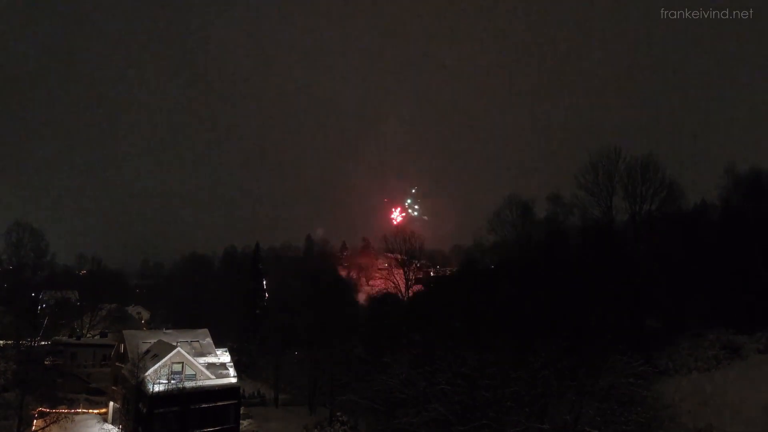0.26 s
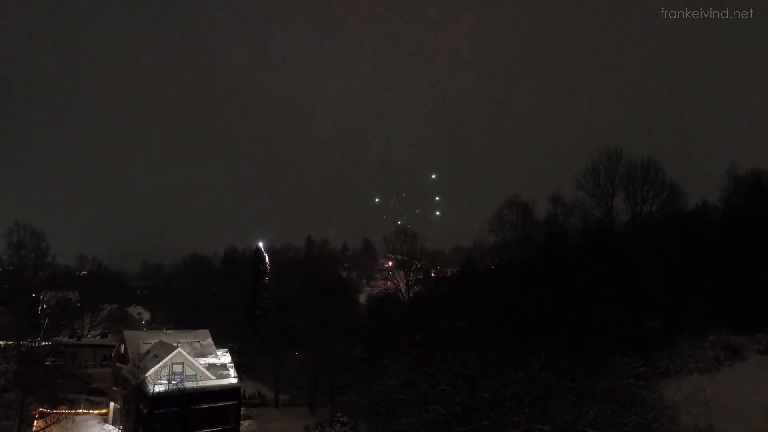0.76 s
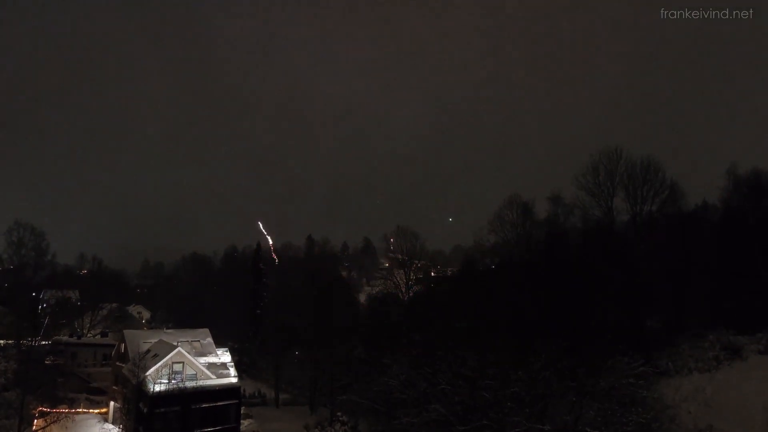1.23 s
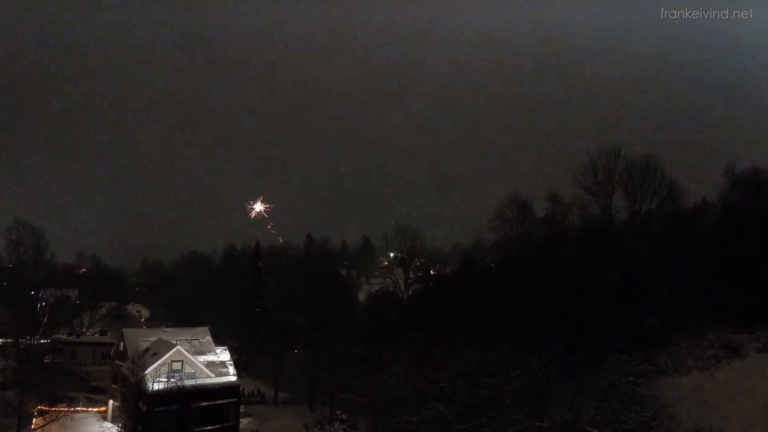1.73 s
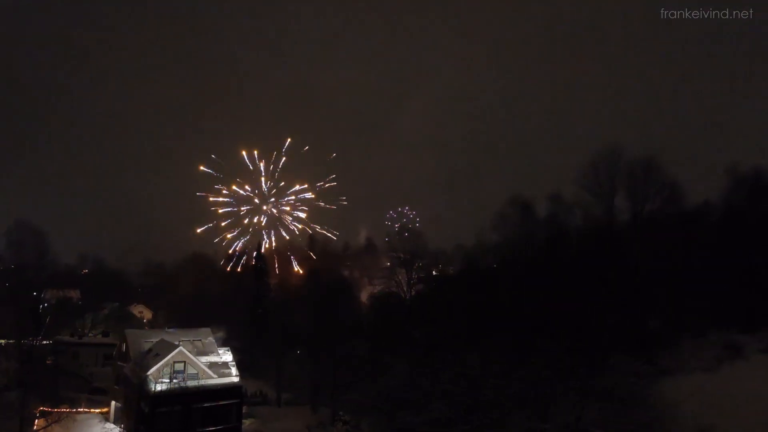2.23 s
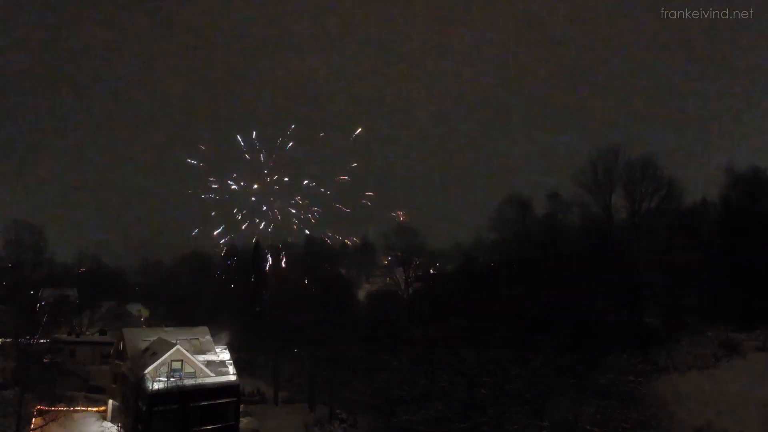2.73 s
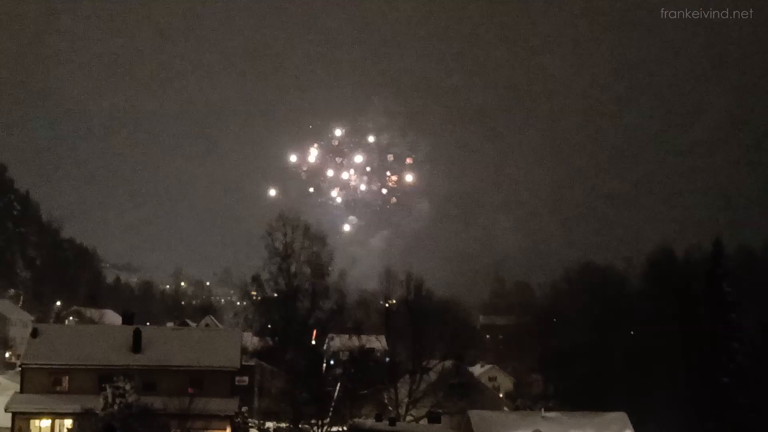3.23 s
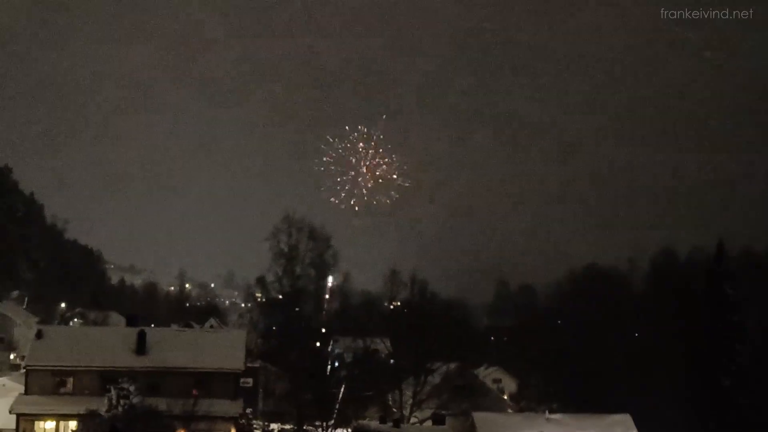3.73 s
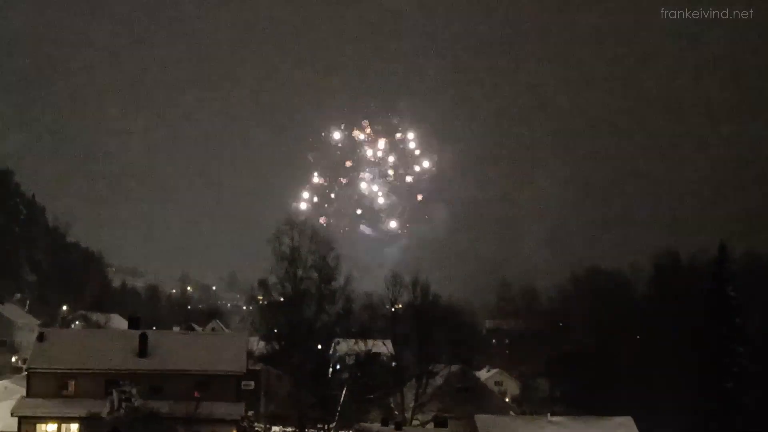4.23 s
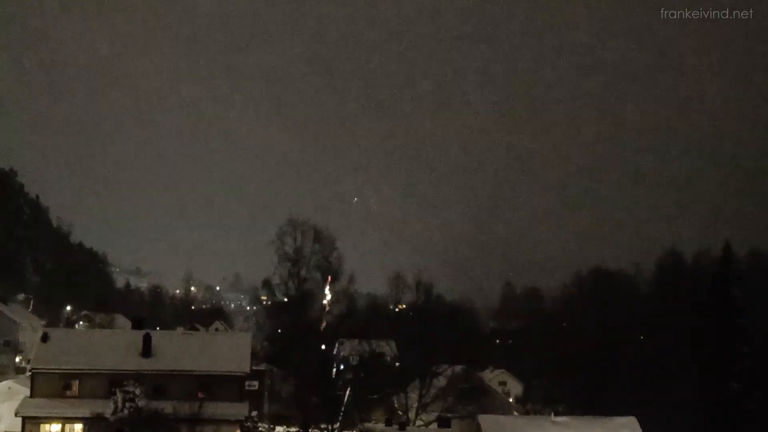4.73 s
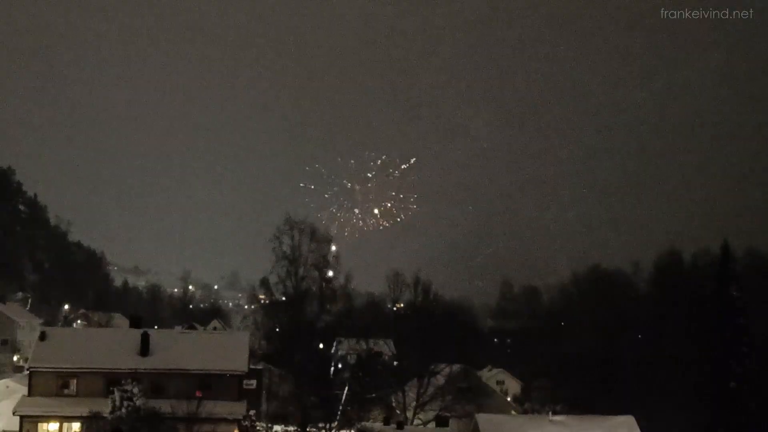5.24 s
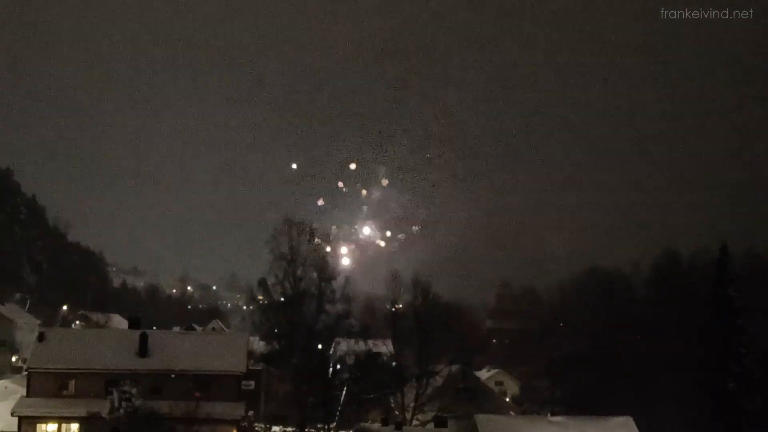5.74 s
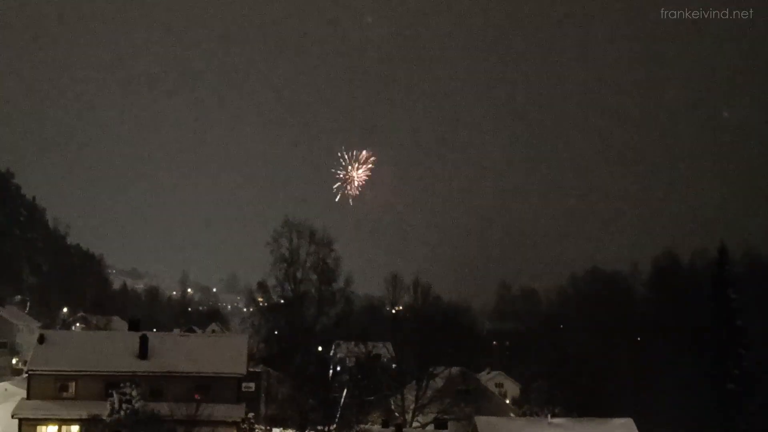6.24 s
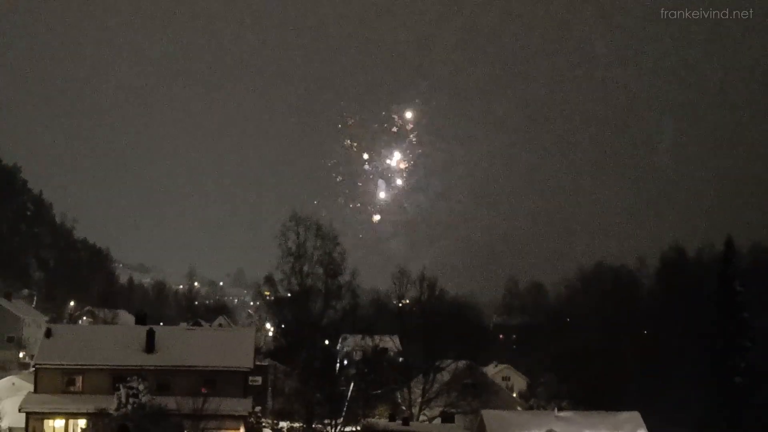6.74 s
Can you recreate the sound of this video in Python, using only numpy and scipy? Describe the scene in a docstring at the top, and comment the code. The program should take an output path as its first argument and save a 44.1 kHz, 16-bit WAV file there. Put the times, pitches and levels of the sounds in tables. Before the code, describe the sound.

A continuous distant barrage rumbles beneath irregular firework bangs, some deep and blurred, others loud and punchy, with short house slaps and longer hillside echoes. Low wind puffs buffet either side of the small outdoor microphone. Faint pips, sizzling rockets and stray sparks come first; after a click and short dip around three seconds, bright dense crackles bloom ahead four or five times, the last overlapping at the end.

```python
"""Fireworks over a snowy neighbourhood, outdoors on a small two-port microphone, a wall a metre behind it. From
the start wind flutters on the ports and many far bursts merge into a rumble; soon shells go off, each one
pressure pulse with echoes off houses and trees. Faint ringing pips, fizzing rocket tails and stray sparks
(filtered grains) follow, then dry cracks with a steep edge. Near three seconds a click sounds and the level
dips briefly; after it, clouds of crackling stars swell and burn out, made of many small reports with echoes."""
import sys
import numpy as np
from scipy import signal
from scipy.fft import rfft, irfft, next_fast_len
from scipy.io import wavfile
from scipy.ndimage import uniform_filter1d

SR = 44100
rng = np.random.default_rng(int(sys.argv[2]) if len(sys.argv) > 2 else 0)


def unload_audio(sound):
    """Save the sound as a 16-bit wav file, at the path given as the first command line argument."""
    columns = np.transpose(np.atleast_2d(sound))
    # keep every value between -1 and 1, then stretch to whole-number steps
    steps = np.round(np.clip(columns, -1, 1) * 32767)
    wavfile.write(sys.argv[1], SR, steps.astype(np.int16))


N = 307818
TIME = np.arange(N) / SR
SIZE = 16384  # samples in one pulse or echo pattern
PORT_LAG_S = .00058  # lag between the ports for a sound from the side
TOP_HZ = 16400  # top of the microphone's range
BURN_STEEPNESS = 3  # how abruptly a cloud of sparks lights up and dies
STRAY_FROM_S = 0.91  # when stray sparks begin to spit

# Levels in the tables come before each layer's own gain.
# Level of the far barrage by direction: [t/s, from the right level/dB, from ahead level/dB]
FAR_BARRAGE = [(0, -35.5, -34.5), (1.52, -32.5, -36.5), (2.25, -38.5, -39), (2.75, -31, -32),
               (2.999, -40, -30.5), (3.7, -39.5, -33), (5.35, -36, -32.5), (5.72, -39.5, -34.5),
               (6.12, -41.5, -36.5), (6.28, -39.5, -32.5), (6.98, -36, -33.5)]
# Wind puffs: [t/s at the height, spread/s (standard deviation), level/dB, side (-1 left port, 1 right port)]
WIND_PUFFS = [(0.064, 0.11, -23, 1), (0.497, 0.023, -17, 1), (0.984, 0.079, -18.5, -1),
              (1.148, 0.018, -16, -1), (1.337, 0.013, -8, -1), (2.37, 0.055, -18.5, -1),
              (4.226, 0.021, -21.5, 1), (4.671, 0.016, -16.5, 1), (4.725, 0.015, -9.5, 1),
              (5.154, 0.075, -18.5, -1), (5.581, 0.08, -25.5, -1)]
# Shell bursts and their loudest separate echoes, each row one pulse: [t/s, peak level/dB of the bare pulse,
# boom f/Hz (lower for a bigger charge), echo level/dB (more when screened by trees), launch site]. Rows a few
# ms to some tens of ms after a loud burst, such as 0.8892, 0.8994 and 1.1314, are its echoes.
SHELL_PULSES = [(0.244, -4, 310, 6.5, "right"), (0.2554, -9, 280, -6, "half right"),
                (0.2968, -14.5, 180, 4, "far right"), (.444, -16, 171, -4.5, "far right"),
                (.5123, -4.5, 1100, -6, "ahead"), (0.5206, -11, 1800, 0, "right"),
                (0.6247, -9, 420, 8.5, "right"), (0.6499, -8.5, 770, -4, "half right"),
                (0.8797, .5, 620, -1, "ahead"), (0.8892, -7, 520, -2, "ahead"),
                (0.8994, -5, 450, -4, "ahead"), (1.1133, 0, 750, -3, "ahead"),
                (1.1314, -7.5, 550, -2, "half right"), (1.462, -.5, 290, -2.5, "right"),
                (1.4671, -3, 280, -8, "half right"), (1.4704, -1.5, 350, -6, "right"),
                (1.522, -12, 173, 4, "far right"), (1.749, -12, 470, 5.5, "near"),
                (1.8108, -10, 1200, 4.5, "half right"), (1.96, -8.5, 750, 0.5, "half right"),
                (2.1256, -13.5, 330, -2, "far right"), (2.228, -15, 450, -3.5, "far right"),
                (2.409, -0.5, 260, 1, "ahead"), (2.4345, -1.5, 260, 1, "half right"),
                (2.4635, -8.5, 150, 7.5, "half right"), (2.502, -0.5, 150, -1.5, "half right"),
                (2.6882, -3.5, 290, 1.5, "near"), (2.7475, 0, 800, -5.5, "ahead"),
                (2.8354, -17, 260, 5.5, "half right"), (2.9431, 1.5, 278, -5, "half right"),
                (2.987, -5.5, 415, 0, "far right"), (3.0923, -4.5, 1000, -6.5, "half right"),
                (3.1005, -2, 515, -18, "far right"), (3.2443, -2.5, 150, 4, "right"),
                (3.3175, -8.5, 194, -26, "half right"), (3.7275, -3.5, 600, -18, "far right"),
                (3.796, -8, 480, 0.5, "far right"), (4.1017, -2, 680, -10, "far right"),
                (4.1542, -5, 480, 5, "far right"), (4.1813, -8, 239, 7.5, "right"),
                (4.3957, -11, 220, 8, "left"), (4.4089, 0, 330, -1, "near"), (4.4244, -1, 393, -13, "left"),
                (4.5068, -6.5, 587, -5, "left"), (4.585, -14, 455, 0.5, "far right"),
                (4.8274, -6.5, 450, -1.5, "far right"), (4.905, -15, 330, -2, "far right"),
                (5.131, -10.5, 910, 7.5, "far right"), (5.1765, -6, 300, 4.5, "right"),
                (5.2106, -1.5, 470, 0, "far right"), (5.595, -12.5, 600, 5, "far right"),
                (5.6155, -3.5, 520, -4, "far right"), (5.6368, -5, 720, -9, "far right"),
                (5.7354, -1.5, 600, -4.5, "near"), (5.7494, -5, 330, -8, "left"),
                (5.8142, -11.5, 520, 0.5, "far right"), (5.831, -13.5, 900, 0.5, "far right"),
                (5.9519, -6, 520, -4, "far ahead"), (5.9888, 0, 620, -10.5, "far right"),
                (6.047, -15.5, 330, 1.5, "far right"), (6.178, -11, 1150, -2, "far right"),
                (6.239, -14, 300, -2, "far right"), (6.5193, -5.5, 1500, -3, "near"),
                (6.682, -4.5, 1470, 0, "ahead"), (6.697, -4, 380, 2, "ahead"),
                (6.7858, -8.5, 500, -10, "near"), (6.8195, -11, 1450, 2, "near")]
# Launch sites; the name is only a label, the lag sets the direction heard. By name:
# [air cut-off f/Hz (lower when far), left port late/ms, left port late for the echoes/ms,
# lag of the nearest house front's slap/ms, slap level/dB, body f/Hz, body level/dB]
LAUNCH_SITES = {"ahead": (2900, 0, 0.24, 18.5, -17, 1020, 3.5),
                "near": (6006, 0, 0.56, 14.5, -14.5, 1597, 5),
                "right": (3201, 0.44, .5, 4.5, -10, 1498, 7.5),
                "half right": (2000.5, 0.48, 0.44, 8.5, -13, 326.5, 3.5),
                "far right": (1120, 0.51, 0.44, 11, -19.5, 571.5, 1.5),
                "left": (1597, 0.27, 0.2, 9, -16, 1399.5, 5.5),
                "far ahead": (1000, -0.5, 0.9, 9.5, -14, 514, 4)}
# Faint pips: [t/s, peak level/dB]
FAINT_PIPS = [(.8, -29), (.815, -32), (.838, -34), (.853, -36)]
# Fizzing rocket tails: [t/s at the height, half width/s, level/dB]
ROCKET_TAILS = [(.82, 0.043, -55), (1.2, 0.12, -49.5), (1.48, 0.17, -41.5), (1.9, .15, -48.5),
                (2.485, 0.052, -36), (2.64, 0.13, -47), (2.88, 0.063, -52), (4.62, 0.14, -57),
                (5.85, 0.2, -56)]
# Single loud sparks: [t/s, peak level/dB]
LOUD_SPARKS = [(2.179, -26), (2.331, -22.5), (2.339, -25), (2.356, -26.5), (3.909, -25.5), (4.499, -22.5),
               (6.187, -26)]
# Very sharp, dry cracks: [t/s, peak level/dB before panning, cut-off f/Hz, left minus right level/dB, echo level/dB]
SHARP_CRACKS = [(2.034, -20, 6800, -13, 11), (2.409, -20, 11400, 0, 6), (2.689, -13, 12300, 2, 12),
                (3.3021, 3.5, 11000, -12, -10.5)]
# Clouds of crackling stars: [t/s at the height, half width/s, level/dB]
STAR_CLOUDS = [(3.282, 0.21, -29.5), (4.15, 0.19, -26), (5.192, 0.17, -25), (6.52, .14, -24.5),
               (6.678, 0.091, -25)]
# Single loud stars: [t/s, peak level/dB]
LOUD_STARS = [(3.202, -12), (3.226, -8.5), (3.241, -8), (3.296, -8), (3.472, -14.5), (4.042, -15.5),
              (4.073, -14), (4.215, -13), (5.019, -15.5), (5.05, -10.5), (5.071, -15), (5.081, -8.5),
              (5.261, -9), (5.307, -15), (5.389, -13), (5.459, -15.5), (5.472, -14.5), (6.367, -10.5),
              (6.375, -10.5), (6.439, -12.5), (6.495, -9.5), (6.582, -10), (6.593, -7), (6.626, -8),
              (6.669, -12), (6.704, -5), (6.727, -7.5), (6.786, -11.5), (6.89, -16)]
# Spectral colour of far rumble, wind, shells, fizz and crackle, each: [f/Hz, level/dB]
FAR_COLOUR = [(25, -28), (70, -9.5), (150, 2.5), (480, 2.5), (800, -6.5), (1900, -12.5), (2700, -28),
              (3900, -32.5), (5000, -55.5), (8000, -61), (15000, -75)]
WIND_SPECTRUM = [(20, -17.5), (50, -4), (120, -0.5), (180, -10), (400, -27.5), (6000, -100)]
SHELL_COLOUR = [(40, -9), (100, 2), (190, 2), (500, -.5), (800, -3.5), (2050, -1), (2700, -11), (4000, -2),
                (6300, -13), (8500, -32), (16000, -36)]
SPARK_COLOUR = [(400, 7), (1900, 7), (2600, -1.5), (3500, 3.5), (4400, -1), (5000, -5.5), (6200, -6.5),
                (7200, -27), (10000, -45.5)]
STAR_COLOUR = [(150, -9), (500, -5.5), (1100, 6), (2100, 5.5), (2600, -13), (3100, -20), (3700, -5.5),
               (4400, -9), (5000, -21), (6400, -32), (7500, -46.5), (12000, -61)]


def undb(db):
    """Decibels to gain."""
    return 10 ** (np.asarray(db) / 20)


def unit(x):
    """Scale to rms 1."""
    return x / np.sqrt(np.mean(x ** 2))


def response(points, size=2048):
    """Causal (minimum-phase) impulse response with the given (f/Hz, level/dB) colour."""
    hz, db = np.transpose(points)
    log_hz = np.log(np.fft.rfftfreq(size, 1 / SR) + 1)
    log_gain = np.log(undb(np.interp(log_hz, np.log(hz), db)))
    # folding the cepstrum onto positive times makes the response causal
    cepstrum = irfft(log_gain)
    cepstrum[1:size // 2] *= 2
    cepstrum[size // 2 + 1:] = 0
    return irfft(np.exp(rfft(cepstrum)))


def ring(x, impulse):
    """Pass both channels through an impulse response."""
    return signal.oaconvolve(x, np.atleast_2d(impulse), axes=1)[:, :x.shape[1]]


def add(out, sound, start_s):
    """Mix a stereo sound in at a given time."""
    i = max(int(start_s * SR), 0)
    out[:, i:i + sound.shape[1]] += sound[:, :max(N - i, 0)]


def arrivals(times, sizes, lags, length):
    """Impulses that reach the two ports a little apart, by their direction."""
    out = np.zeros((2, length))
    for port, when in zip(out, (times + lags / 2, times - lags / 2)):
        np.add.at(port, np.round(when * SR).astype(int) % length, sizes)
    return out


def echoes(decay_s, count, lag_s=0, width=0.92, rise_s=0.0074):
    """Reflections scattered about the source's direction, building up and dying away; energy 1 per port."""
    when, where = rng.random((2, count))
    times = PORT_LAG_S * 2 + when * min(5 * decay_s, SIZE / SR - .01)
    envelope = np.exp(-times / decay_s) * (1 - np.exp(-times / rise_s))
    sizes = rng.standard_normal(count) * envelope
    lags = np.clip(lag_s + width * PORT_LAG_S * (2 * where - 1), -PORT_LAG_S, PORT_LAG_S)
    return arrivals(times, sizes / np.linalg.norm(sizes), lags, SIZE)


def swarm(colour, count, spread_db, width, echo_s, echo_db, echo_width, lag_s=0, parts=4):
    """Many small reports of uneven size from a sector of the sky; rms 1."""
    when, where, sign = rng.random((3, count))
    sizes = undb(spread_db * np.minimum(rng.exponential(size=count), 3)) * np.sign(sign - .5)
    length = N + SIZE  # echoes of earlier reports are already in the air
    times = when * length / SR
    lags = lag_s + width * PORT_LAG_S * (2 * where - 1)
    pops = np.zeros((2, length))
    for k in range(parts):  # each part of the sky has its own pattern of echoes
        direct = arrivals(times[k::parts], sizes[k::parts], lags[k::parts], length)
        pattern = echoes(echo_s, count=700, lag_s=lag_s, width=echo_width, rise_s=echo_s / 3)
        pops += direct + undb(echo_db) * ring(direct, pattern)
    # the supply of reports is steady over a tenth of a second
    power = uniform_filter1d(np.mean(pops ** 2, axis=0), size=SR // 10)
    pops /= np.sqrt(power + 1e-9)
    return unit(ring(pops, response(colour))[:, SIZE:])


def singles(rows, colour, echo_s, echo_db):
    """Lone sharp reports at (t/s, peak level/dB), each with its own brief rattle of echoes."""
    out, snap = np.zeros((2, N)), response(colour)
    snap = np.pad(snap / np.abs(snap).max(), (0, SIZE - len(snap)))
    for s, db in rows:
        rattle = ring(echoes(echo_s, count=100, width=0.4), snap)
        add(out, undb(db) * (snap + undb(echo_db) * rattle), s)
    return out


def burning(clouds):
    """Gain over time of clouds that each light up, hold and burn out; their powers add."""
    power = np.zeros(N)
    for s, half_s, db in clouds:
        swell = 1 / (1 + np.abs((TIME - s) / half_s) ** BURN_STEEPNESS)
        power += (undb(db) * swell) ** 2
    return np.sqrt(power)


def mottle(sound, depth_db, hold_s):
    """Every half octave swells and fades on its own; rms 1."""
    padded = next_fast_len(N)
    spectrum, out = rfft(sound, padded), 0
    # position on a half-octave scale that starts at 100 Hz
    place = np.clip(2 * np.log2(np.fft.rfftfreq(padded, 1 / SR) / 100 + 1e-9), 0, 10)
    for band, levels in enumerate(rng.standard_normal((11, 512))):
        part = irfft(spectrum * np.maximum(1 - np.abs(place - band), 0), padded)[:, :N]
        drift = np.interp(TIME / hold_s + rng.random(), np.arange(len(levels)), levels)
        out = out + part * undb(depth_db * drift)
    return unit(out)


def wind(breeze_db=-41.5):
    """Eddies buffet each port on its own: low noise over a steady breeze, pushed up by puffs."""
    push = np.full((2, N), undb(breeze_db))
    for s, spread_s, db, side in WIND_PUFFS:
        push[int(side > 0)] += undb(db) * np.exp(-.5 * ((TIME - s) / spread_s) ** 2)
    eddies = ring(rng.standard_normal((2, N)), response(WIND_SPECTRUM))
    steady_level = np.sqrt(uniform_filter1d(eddies ** 2, size=SR // 20) + 1e-12)
    return push * eddies / steady_level


def barrage(gain_db=2.5):
    """Far bursts to the right and ahead arrive mostly as echoes and blur into a rumble of shifting colour."""
    s, right_db, ahead_db = np.transpose(FAR_BARRAGE)
    right = swarm(FAR_COLOUR, count=1200, spread_db=4.0, width=0.37, echo_s=.012, echo_db=1.5,
                  echo_width=0.71, lag_s=0.0004, parts=8)
    ahead = swarm(FAR_COLOUR, count=700, spread_db=3.0, width=.4, echo_s=.012, echo_db=6,
                  echo_width=0.78, lag_s=-0.000064, parts=8)
    out = np.zeros((2, N))
    for thuds, db in ((right, right_db), (ahead, ahead_db)):
        level = undb(gain_db + np.interp(TIME, s, db))
        out += level * mottle(thuds, depth_db=3.0, hold_s=.07)
    return out


def shells(near_s=.018, near_db=2.0, far_s=0.54, far_db=-12.0, echo_hz=6000, damping=0.82,
           gain_db=-0.36, body_width=0.22, slap_spray_db=-2):
    """A push and a longer suck of air, rounded by distance and coloured by the ground it crosses;
    near houses and then the hillsides throw it back."""
    out, hz = np.zeros((2, N)), np.fft.rfftfreq(SIZE, 1 / SR)
    colour = rfft(response(SHELL_COLOUR), SIZE)
    lead_s = PORT_LAG_S  # room for the earlier port
    for s, db, boom_hz, echo_db, site in SHELL_PULSES:
        air_hz, lag_ms, echo_lag_ms, slap_ms, slap_db, body_hz, body_db = LAUNCH_SITES[site]
        lag_s, echo_lag_s, slap_s = lag_ms / 1000, echo_lag_ms / 1000, slap_ms / 1000

        w, b, a = 1j * hz / boom_hz, 1j * hz / body_hz, 1j * hz / air_hz
        boom = w / (1 + damping * w + w * w)
        body = 1 + (undb(body_db) - 1) * body_width * b / (1 + body_width * b + b * b)
        air = 1 / ((1 + a) * (1 + a + a * a))
        pulse = colour * body * boom * air
        pulse /= np.abs(irfft(pulse)).max()

        port_delays_s = lead_s + np.array([[lag_s], [-lag_s]]) / 2
        direct = np.exp(-2j * np.pi * hz * port_delays_s)
        near = rfft(echoes(near_s, count=170, lag_s=echo_lag_s, width=0.43, rise_s=0.0012))
        near /= np.linalg.norm(near * pulse) / np.linalg.norm(direct * pulse)  # as strong as the direct pulse
        far = rfft(echoes(far_s, count=1500, rise_s=0.0046))
        spray = undb(near_db + echo_db) * near + undb(far_db) * far
        slap = undb(slap_db) * (direct + undb(slap_spray_db) * near)
        slap = slap * np.exp(-2j * np.pi * hz * slap_s)
        returned = (slap + spray) / (1 + 1j * hz / echo_hz)
        add(out, undb(db + gain_db) * irfft(pulse * (direct + returned)), s - lead_s)
    return out


def wall(sound, delay_s=0.00553, db=-11, dull_hz=800):
    """A wall about a metre behind the microphone returns a dull copy."""
    out = sound.copy()
    dull = signal.sosfilt(signal.butter(1, dull_hz, fs=SR, output="sos"), sound)
    add(out, undb(db) * dull, delay_s)
    return out


def pips(pitch_hz=1900, ring_s=.003, echo_db=-2, scatter=.025):
    """A quick run of faint pips, each a short ring of slightly different pitch with a scatter of echoes."""
    out, t = np.zeros((2, N)), TIME[:SIZE]
    envelope = 2 * t / ring_s * np.exp(1 - 2 * t / ring_s)
    for (s, db), detune in zip(FAINT_PIPS, rng.standard_normal(len(FAINT_PIPS))):
        note = np.sin(2 * np.pi * pitch_hz * (1 + scatter * detune) * t) * envelope
        rattle = ring(echoes(ring_s, count=60, width=.3), note)
        add(out, undb(db) * (note + undb(echo_db) * rattle), s)
    return out


def sparks(gain_db=8.5, shower_db=-18.5):
    """The fine sizzle of burning rocket tails; every cloud of stars sizzles a little too."""
    grains = swarm(SPARK_COLOUR, count=2100, spread_db=1.5, width=0.27, echo_s=0.004, echo_db=2.5,
                   echo_width=0.41)
    level = np.hypot(burning(ROCKET_TAILS), undb(shower_db) * burning(STAR_CLOUDS))
    return undb(gain_db) * grains * level


def strays(gain_db=-56, spit_db=0):
    """Lone sparks spit now and then, faint ones scattered at random and single loud ones."""
    ticks = swarm(SPARK_COLOUR, count=420, spread_db=4.0, width=0.36, echo_s=0.0036, echo_db=2.0,
                  echo_width=0.24)
    spits = singles(LOUD_SPARKS, SPARK_COLOUR, echo_s=0.0058, echo_db=4.5)
    return undb(gain_db) * ticks * (TIME > STRAY_FROM_S) + undb(spit_db) * spits


def cracks(length_s=0.00024, echo_s=0.00036):
    """Shock fronts that still have their steep edge, with a brief rattle of echoes."""
    out, t = np.zeros((2, N)), TIME[:SIZE]
    for s, db, top_hz, pan_db, echo_db in SHARP_CRACKS:
        shock = (1 - t / length_s) * np.exp(-t / length_s)
        edge = signal.ellip(6, .5, 50, top_hz, fs=SR, output="sos")
        shock = signal.sosfilt(edge, shock + 1e-18)
        shock = shock + undb(echo_db) * ring(echoes(echo_s, count=60), shock)
        port_db = db + np.array([[pan_db], [-pan_db]]) / 2
        add(out, undb(port_db) * shock / np.abs(shock).max(), s)
    return out


def click_and_dip(sound, at_s=2.9465, click_db=-5.5, pan_db=8, click_s=0.00014, dip_db=-17, recover_s=0.063):
    """Just after a boom begins, a dry click sounds, louder on the left, and the level of everything dips
    briefly."""
    since, after = np.maximum(TIME - at_s, 0), TIME >= at_s
    port_db = click_db + np.array([[pan_db], [-pan_db]]) / 2
    click = undb(port_db) * after * np.exp(-since / click_s)
    dip = undb(dip_db * after * np.exp(-since / recover_s))
    return sound * dip + click


def stars(gain_db=-2, snap_db=-2.5, snap_tilt_db=2.5):
    """Clouds of crackling stars straight ahead swell and burn out; the closest stars snap out of them,
    brighter by some dB per octave."""
    pops = swarm(STAR_COLOUR, count=2000, spread_db=3.1, width=0.13, echo_s=.002, echo_db=0,
                 echo_width=0.38, parts=8)
    bright = [(hz, db + snap_tilt_db * np.log2(hz)) for hz, db in STAR_COLOUR]
    snaps = singles(LOUD_STARS, bright, echo_s=.0016, echo_db=-1)
    return undb(gain_db) * pops * burning(STAR_CLOUDS) + undb(snap_db) * snaps


def scene():
    """Everything in the night sky, and the wind at the microphone."""
    sky = wall(barrage() + shells() + pips() + sparks() + strays() + stars())
    return click_and_dip(wind() + sky + cracks())


def record(dry):
    """The microphone flattens the loudest peaks; the top is cut."""
    rounded = dry / (1 + (dry / .88) ** 6) ** (1 / 6)
    return signal.sosfilt(signal.butter(16, TOP_HZ, fs=SR, output="sos"), rounded)


dry = scene()
out = record(dry)
unload_audio(out)
```